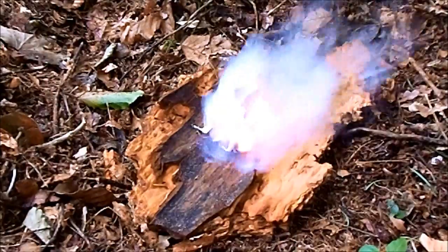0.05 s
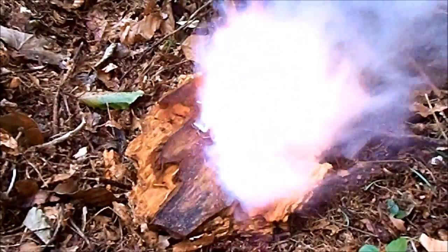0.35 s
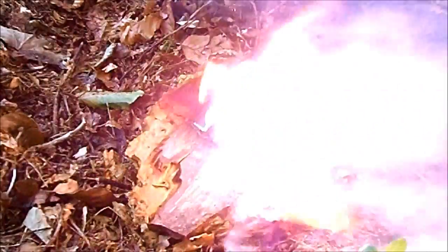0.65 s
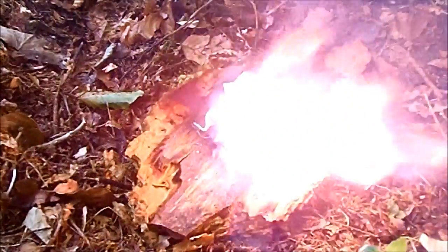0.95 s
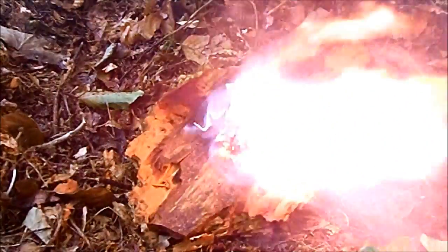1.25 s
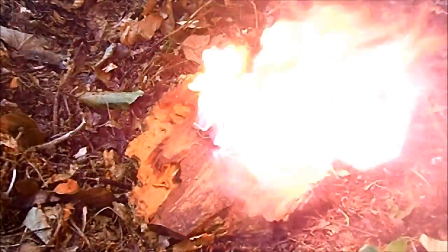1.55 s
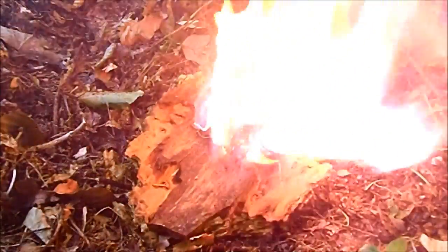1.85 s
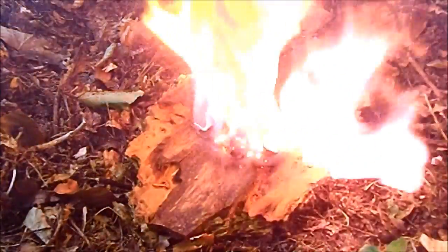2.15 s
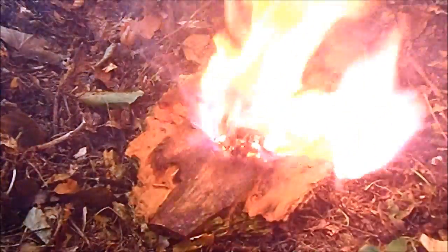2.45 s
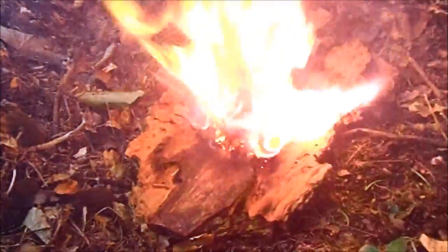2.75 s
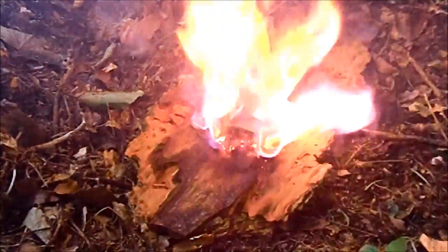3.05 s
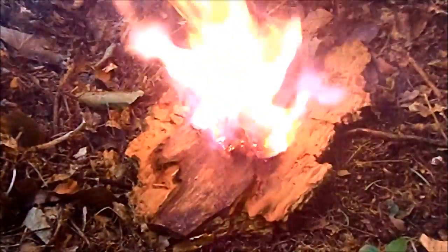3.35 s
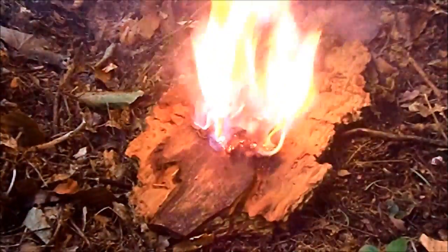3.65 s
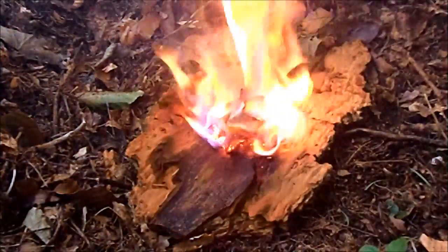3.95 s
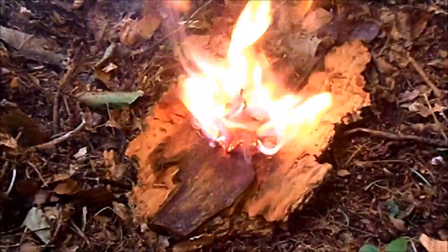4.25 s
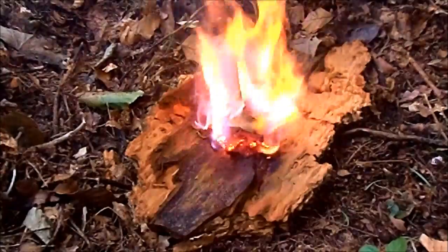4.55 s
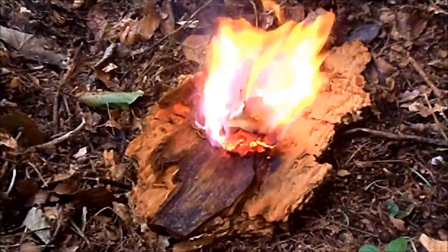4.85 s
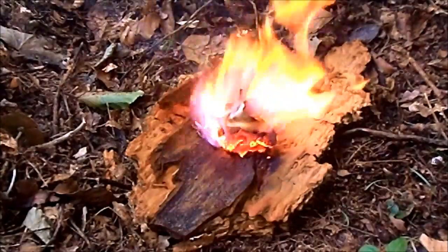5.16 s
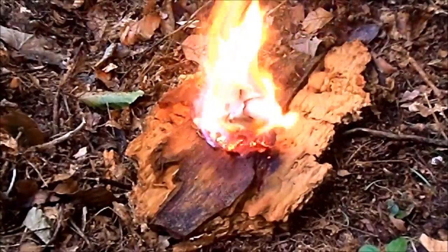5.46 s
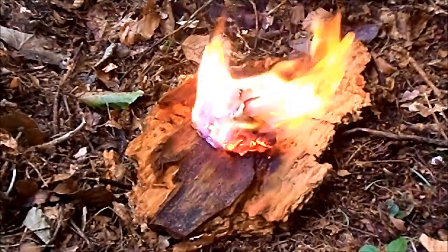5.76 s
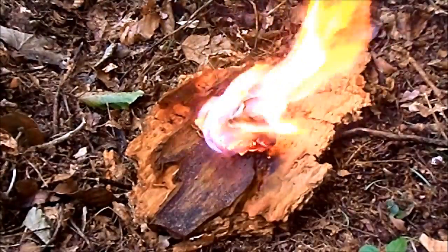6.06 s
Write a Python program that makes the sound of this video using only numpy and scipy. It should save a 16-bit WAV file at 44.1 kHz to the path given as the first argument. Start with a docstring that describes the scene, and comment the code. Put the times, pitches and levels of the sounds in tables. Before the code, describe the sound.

A chemical mixture on a wad of cotton flares up with a bright, dense fizz and a few low puffs of gas. The fizz turns into a duller, crackling sizzle, then weakens about halfway through and thins out to single sharp pops. A soft flame rumble flutters underneath. The microphone is close to the fire, on a woodland floor in still air, with almost no echo.

```python
"""A chemical mixture flares on a wad of cotton, on bark on a woodland floor, close to the microphone.
Its tiny bursts fizz brightly at first, turn to a duller sizzle and thin out to single sharp pops
as the burning weakens. Underneath, the flame rumbles and puffs as it dies down.
Bark, leaf litter and trunks scatter each click a little; one faint rustle passes in the still air."""
import sys
import numpy as np
from scipy import signal
from scipy.fft import rfft, irfft, next_fast_len
from scipy.io import wavfile
from scipy.ndimage import uniform_filter1d, map_coordinates

SR = 44100
rng = np.random.default_rng(int(sys.argv[2]) if len(sys.argv) > 2 else 0)


def master(y):
    """Save y as 16-bit WAV."""
    cut = np.clip(np.atleast_2d(y).T, -1, 1)
    pcm = np.round(cut * 32767)  # scale
    wavfile.write(sys.argv[1], SR, pcm.astype(np.int16))


N = 277830

# How hard the mixture burns, relative to full flare: time_s, level_db
BURN_STRENGTH = [(0, 4), (.16, -.5), (.66, -1), (.8, 3), (.97, .5), (1.04, -4.5), (1.38, -2.5),
                 (1.52, -7.5), (1.63, -1.5), (2.2, -1), (2.68, -0.5), (3.16, 1.5), (3.38, -4.5),
                 (3.68, -10.5), (3.93, -12), (4.02, -17), (4.85, -18.5), (6.3, -24.5)]
# How far the bright fizz stands above the sizzle: time_s, level_db
FIZZ_LEAD = [(0, 8), (.48, 13), (.62, 5), (.8, 8), (1.3, 6), (1.55, 3), (3.2, .8), (3.5, 3), (4, 1),
             (6.3, 1.5)]
# Tone of the dull sizzle, close up: frequency_hz, gain_db
SIZZLE_SPECTRUM = [(100, -7), (300, -6), (700, -7), (1400, -9.5), (2100, -4.5), (3300, -1.5), (5500, -0.5),
                   (6800, -1), (8500, -9), (14000, -28)]
# Tone of the bright fizz, close up: frequency_hz, gain_db
FIZZ_SPECTRUM = [(2000, -32), (5500, -29), (6800, -14), (8000, 1.5), (10500, 3), (13500, 3.5),
                 (16000, -7.5)]

def sizzle(bursts_per_s=850, spread_db=5, clump_db=2.4, chain_db=2.5, gas_db=-12, sizzle_db=-52):
    """Tiny, unequal bursts clump over the hiss of escaping gas; harder burning makes them denser."""
    burn_db = curve(BURN_STRENGTH)
    level_db = sizzle_db + burn_db + wobble(12)  # sputters by about 1 dB
    fires = rng.random(N) < bursts_per_s * amp(0.55 * burn_db) / SR
    clumps = amp(clump_db * wobble(55) + chain_db * wobble(400))  # one burst sets off its neighbours
    sizes = amp(spread_db * np.minimum(rng.standard_normal(N), 1.83))
    bursts = ticks(-sizes * clumps * fires)
    layers = []
    for spectrum in (SIZZLE_SPECTRUM, FIZZ_SPECTRUM):
        crackle = steadied(coloured(bursts, spectrum), seconds=0.12)
        gas = amp(gas_db) * unit(clumps) * noise(spectrum)
        layers.append(steadied(crackle + gas, seconds=0.087))
    dull, bright = layers
    return amp(level_db) * dull + amp(level_db + curve(FIZZ_LEAD)) * bright


def ticks(impulses, lowest_hz=1700, highest_hz=14000, width=0.7, bounce=0.44, pitches=14):
    """Each tiny burst rings briefly and bounces off the bark within a millisecond or so."""
    out = np.zeros(N)
    hz = np.fft.rfftfreq(1024, 1 / SR)
    kinds = rng.integers(pitches, size=N)
    for kind, pitch_hz in enumerate(np.geomspace(lowest_hz, highest_hz, pitches)):
        delay_s = rng.uniform(0.00018, 0.001395)
        reflection = 1 + bounce * np.exp(-2j * np.pi * hz * delay_s)
        tick = irfft(resonance(hz, pitch_hz, width) * reflection)[:len(hz) // 2]
        out += signal.oaconvolve(impulses * (kinds == kind), tick)[:N]
    return out


# The loud bursts of the mixture: start_s, level_db, pitch_hz
LOUD_POPS = [(.01, -4.5, 10200), (.0714, 5, 14000), (0.1501, 1.5, 14100), (0.2293, -5.5, 10700),
             (0.2932, 1.5, 9000), (.3239, -5, 14000), (.3749, -3, 11200), (0.4231, -5.5, 11200),
             (0.4606, -6.5, 7100), (0.6211, -7, 7700), (0.7734, -4.5, 8600), (.8054, -2.5, 14000),
             (.8791, -8, 10700), (0.8958, -5, 12800), (.968, 2, 9700), (0.9911, 0, 14000),
             (1.202, 1, 13400), (1.3364, -11.5, 5600), (1.3814, -10, 4700), (1.4384, -12.5, 6300),
             (1.9293, .5, 7700), (1.941, -11, 8200), (1.9782, -8.5, 7200), (2.0665, -10, 6900),
             (2.0713, -9, 7000), (2.2874, -8.5, 5500), (2.4062, -4, 5400), (2.5063, -8, 5600),
             (2.8051, -11, 7900), (2.9127, -3.5, 6760), (2.9888, -13.5, 4030), (3.0363, -11.5, 5500),
             (3.1701, -8.5, 6000), (3.1874, -12, 3430), (3.279, -11, 5850), (3.3635, -11, 10300),
             (3.4314, -12.5, 5300), (3.4632, -10.5, 8600), (3.522, 1, 9000), (3.5767, -9.5, 5300),
             (3.601, -10.5, 10700), (3.6924, -15, 7200), (3.788, -19, 8100), (3.875, -11, 4730),
             (3.9296, -17, 4600), (3.9737, -21, 8200), (4.0853, -25, 5800), (4.1761, -20, 3400),
             (4.1832, -21, 5300), (4.2173, -17.5, 8200), (4.2914, -16.5, 3300), (4.3047, -11, 6600),
             (4.359, -21.5, 7900), (4.4381, -18.5, 7000), (4.4647, -19.5, 5000), (4.571, -12.5, 3940),
             (4.6354, -3, 4300), (4.6519, -7, 7850), (4.732, -15.5, 8000), (4.7603, -7.5, 5160),
             (4.9001, -20.5, 7200), (5.0481, -17, 6100), (5.1766, -20.5, 7500), (5.204, -23.5, 8600),
             (5.262, -21, 6900), (5.2871, -14, 6300), (5.4653, -20, 9000), (5.7216, -21, 5500),
             (5.81, -12, 6300), (5.9814, -27.5, 6900), (6.0758, -15.5, 5300)]
# Tone of the pops at the microphone: frequency_hz, gain_db
POP_SPECTRUM = [(100, 13.5), (400, 5), (800, 0), (2000, 2.5), (3600, 1.5), (5800, -1.5), (8400, 0.5),
                (12000, 2), (16000, 1.5)]

def pops(splinters=5, splinter_gain=0.15, splinter_s=0.000506, size=512):
    """A larger burst is a pressure spike ringing for about a cycle, with weaker ones right behind."""
    out = np.zeros(N + SR)
    hz = np.fft.rfftfreq(size, 1 / SR)
    for start_s, level_db, pitch_hz in LOUD_POPS + snaps():
        lags, strengths = rng.standard_normal((2, splinters))
        delays = np.exp(-2j * np.pi * np.outer(splinter_s * np.abs(lags), hz))
        cluster = 1 + splinter_gain * strengths @ delays
        spike = np.roll(irfft(resonance(hz, pitch_hz, width=1) * cluster), size // 2)
        start = max(round(start_s * SR) - size // 2, 0)
        out[start:][:size] -= amp(level_db) * spike
    return coloured(out[:N], POP_SPECTRUM)


def snaps(per_s=13, base_db=-15, spread_db=4, base_hz=6000, hz_per_db=700, octaves=0.25, count=200):
    """Rows of middling bursts at chance moments: larger in a hard burn, higher while it fizzes."""
    when, size, pitch = rng.uniform(-1, 1, (count, 3)).T
    start_s = (np.arange(count) + 1 + when) / per_s
    burn_db = np.interp(start_s, *np.transpose(BURN_STRENGTH))
    fizz_db = np.interp(start_s, *np.transpose(FIZZ_LEAD))
    level_db = base_db + 0.85 * burn_db + 0.36 * fizz_db + spread_db * size
    pitch_hz = (base_hz + hz_per_db * fizz_db) * 2 ** (octaves * pitch)
    return list(np.transpose([start_s, level_db, pitch_hz])[start_s < N / SR])


# How strongly the flame billows, relative to full flare: time_s, level_db
BILLOW_STRENGTH = [(0, 5.5), (.33, -1), (.5, 2.5), (.8, 3), (1.5, -4), (1.7, -1.5), (1.9, -3.5), (2.6, -5),
                   (2.87, -2.5), (3.3, -9), (4.1, -10.5), (4.28, -5), (4.55, -5.5), (4.78, -14),
                   (5.1, -3.5), (5.5, -10.5), (6.3, -8)]
# The flame's body, close to the microphone: frequency_hz, gain_db
RUMBLE_SPECTRUM = [(6, -3.5), (12, 5), (20, 2), (35, -7.5), (50, -9), (65, -16), (90, -22.5), (300, -68)]
# The flame's fluttering edge: frequency_hz, gain_db
FLUTTER_SPECTRUM = [(25, -21), (60, -0.5), (75, 5.5), (100, 1.5), (130, -2), (170, -1), (230, -4.5),
                    (320, -11.5), (440, -9.5), (600, -19), (1200, -15), (4000, -36)]

def flame(rumble_db=-49, flutter_db=-62.5, flicker_db=3, fade_db_per_s=1.22):
    """Hot gas billows; the edge flutters with burning and billowing, and fades as the flame shrinks."""
    billow_db = curve(BILLOW_STRENGTH)
    shrink_db = fade_db_per_s * np.arange(N) / SR
    edge_db = flutter_db + 0.28 * curve(BURN_STRENGTH) + 0.31 * billow_db - shrink_db
    rumble = steadied(noise(RUMBLE_SPECTRUM), seconds=0.14)
    flutter = steadied(amp(flicker_db * wobble(30)) * noise(FLUTTER_SPECTRUM), seconds=0.17)
    return amp(rumble_db + billow_db) * rumble + amp(edge_db) * flutter


# Sudden pushes of hot gas: start_s, level_db, pitch_hz, width_ratio
GAS_PUFFS = [(.017, 8, 58, 1.2), (.057, 6, 72, 1.05), (0.0718, -6.5, 400, 2.7), (0.753, 12.5, 62, 0.77),
             (.9681, -3, 600, 3.2), (2.857, 0.5, 150, 0.75), (3.522, -15.5, 438, 1.8), (4.485, -5, 80, 0.8),
             (5.28, -1, 55, 0.64)]

def puffs(size=8192):
    """A pocket of gas that expands at once gives one low push."""
    out = np.zeros(N + SR)
    hz = np.fft.rfftfreq(size, 1 / SR)
    for start_s, level_db, pitch_hz, width in GAS_PUFFS:
        push = irfft(resonance(hz, pitch_hz, width) ** 2)
        out[round(start_s * SR):][:size] -= amp(level_db) * push
    return out[:N]


def woodland_echoes(x, bark=(-18, 0.0056), litter=(-17, 0.042), trunks=(-28, 0.1), spots=24):
    """Each surface (level_db, t60_s) returns a diffuse echo that changes as the burning spot wanders."""
    t = np.arange(SR // 4) / SR
    out = np.zeros(N + SR)
    edges = np.linspace(0, N, spots + 1).astype(int)
    for start, end in zip(edges, edges[1:]):
        echo = 0
        for level_db, t60_s in (bark, litter, trunks):
            build_up = 1 - np.exp(-20 * t / t60_s)  # farther surfaces answer later
            tail = rng.standard_normal(len(t)) * amp(-60 * t / t60_s) * build_up
            echo = echo + amp(level_db) * tail / np.linalg.norm(tail)
        part = signal.fftconvolve(x[start:end], echo)
        out[start:start + len(part)] += part
    return out[:N]


# A rustle beside the fire: frequency_hz, gain_db
RUSTLE_SPECTRUM = [(80, -6), (140, -1), (310, -4), (450, -13), (1400, -16), (2100, -9), (2800, -15),
                   (6000, -30)]

def rustle(middle_s=4.96, half_length_s=0.08, level_db=-68.5):
    """A faint rustle swells and fades once as the fire dies."""
    swell = np.exp(-((np.arange(N) / SR - middle_s) / half_length_s) ** 2)
    return amp(level_db) * swell * noise(RUSTLE_SPECTRUM)


# The wood all around the microphone: frequency_hz, gain_db
AIR_SPECTRUM = [(30, -6), (150, 5), (400, 2.5), (1000, 1), (3000, 1.5), (8000, -2.5), (14000, 3)]

def still_air(level_db=-69.5):
    """The air of the wood is a faint, even hiss."""
    return amp(level_db) * noise(AIR_SPECTRUM)


def amp(db):
    """Decibels to gain."""
    return 10 ** (np.asarray(db) / 20)


def unit(x):
    """x scaled to rms 1."""
    return x / np.sqrt(np.mean(x ** 2) + 1e-20)


def gain_at(spectrum, hz):
    """The gain of a spectrum, read on a log frequency axis."""
    frequency_hz, gain_db = np.transpose(spectrum)
    return amp(np.interp(np.log(hz + 1), np.log(frequency_hz), gain_db))


def curve(rows):
    """(time_s, value) rows as one value per sample."""
    return np.interp(np.arange(N) / SR, *np.transpose(rows))


def wobble(knots_per_s):
    """A smooth random curve."""
    knots = rng.standard_normal(int(N * knots_per_s / SR) + 4)
    return map_coordinates(knots, [np.arange(N) * knots_per_s / SR])


def filtered(x, response):
    """x through a complex frequency response."""
    size = next_fast_len(N + SR // 2)
    return irfft(rfft(x, size) * response(np.fft.rfftfreq(size, 1 / SR)), size)[:N]


def coloured(x, spectrum):
    """x through a causal filter with this spectrum, so that clicks keep their sharp front."""
    def response(hz):
        cepstrum = irfft(np.log(gain_at(spectrum, hz)))
        half = len(cepstrum) // 2
        return np.exp(rfft(np.r_[cepstrum[0], 2 * cepstrum[1:half], np.zeros(half)]))
    return filtered(x, response)


def noise(spectrum):
    """Coloured noise of rms 1."""
    return unit(filtered(rng.standard_normal(N), lambda hz: gain_at(spectrum, hz)))


def resonance(hz, centre_hz, width):
    """A broad resonance; the width is a share of its centre."""
    damping = 1j * hz * centre_hz * width
    return damping / (centre_hz ** 2 - hz ** 2 + damping)


def steadied(x, seconds):
    """x with its slow level held at rms 1."""
    window = int(seconds * SR)
    power = uniform_filter1d(uniform_filter1d(x ** 2, window), window)
    return x / np.sqrt(np.abs(power) + 1e-12)


def scene():
    """Crackle and flame up close, with the wood's echoes and still air behind."""
    crackle = sizzle() + pops()
    return (crackle + woodland_echoes(crackle) + puffs() + flame() + rustle() + still_air())[None]


# The single microphone, close to the bark: frequency_hz, gain_db
MICROPHONE_RESPONSE = [(20, 1), (13700, 0), (14300, -12.5), (15100, -14.5), (15600, -38), (16400, -44)]

def record(dry, top_hz=16480):
    """The microphone rolls off at the top and keeps nothing above its band limit."""
    return filtered(dry[0], lambda hz: gain_at(MICROPHONE_RESPONSE, hz) * (hz < top_hz))[None]


dry = scene()
out = record(dry)
master(out)
```